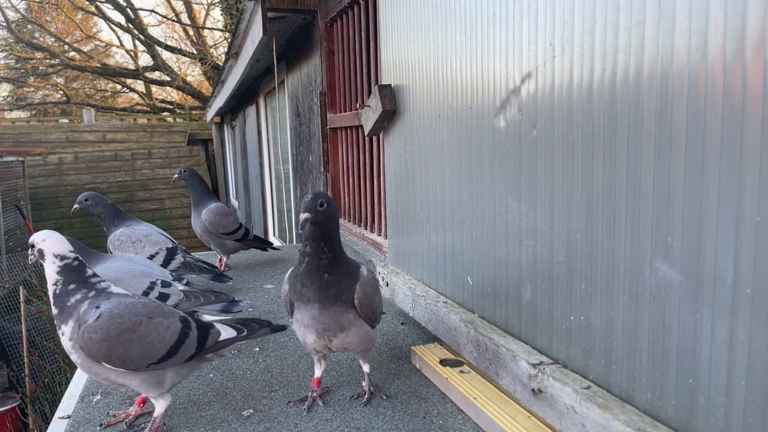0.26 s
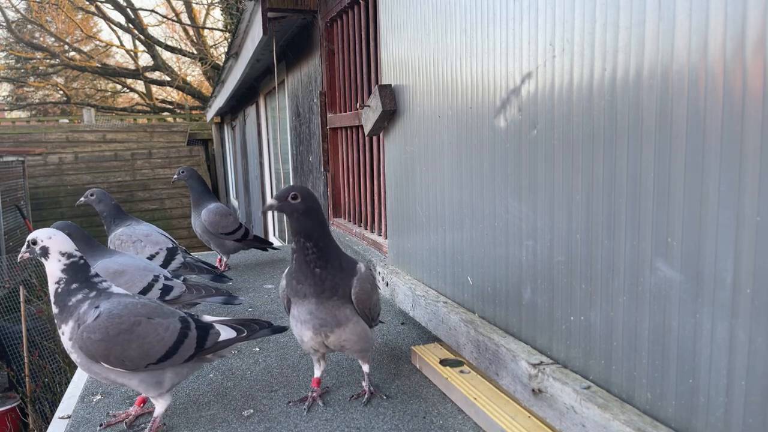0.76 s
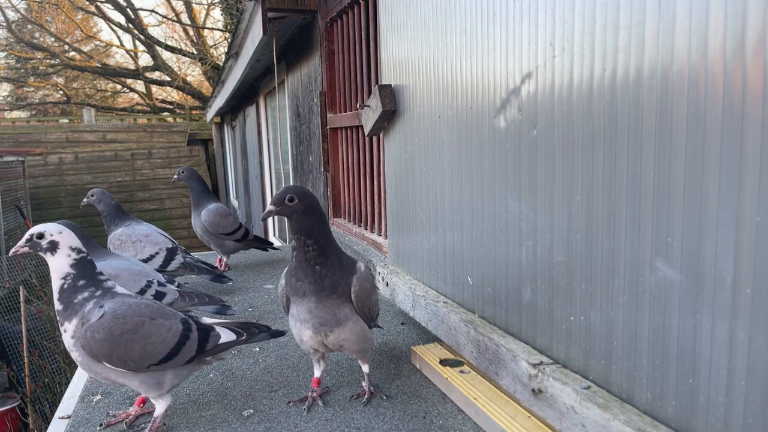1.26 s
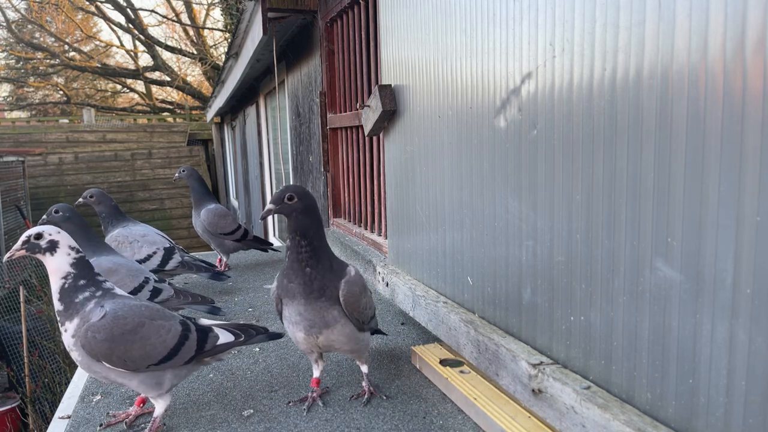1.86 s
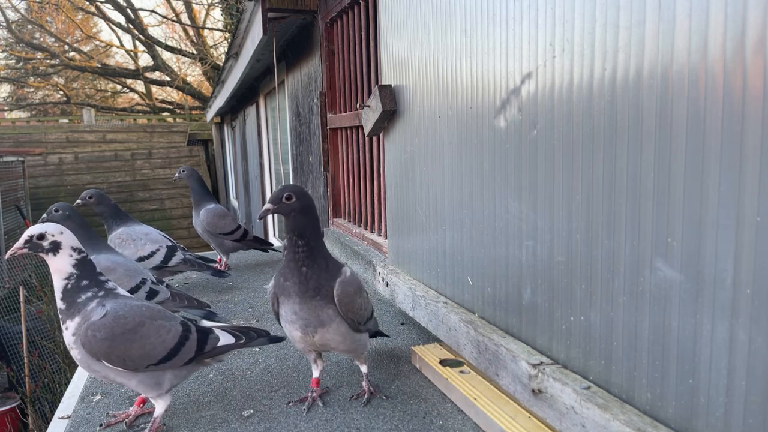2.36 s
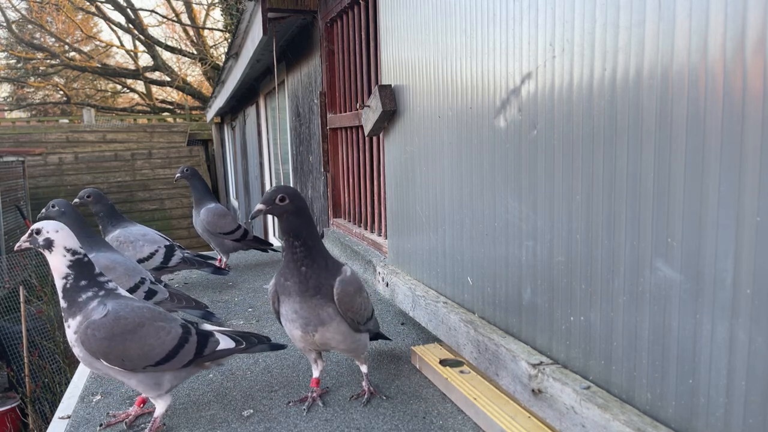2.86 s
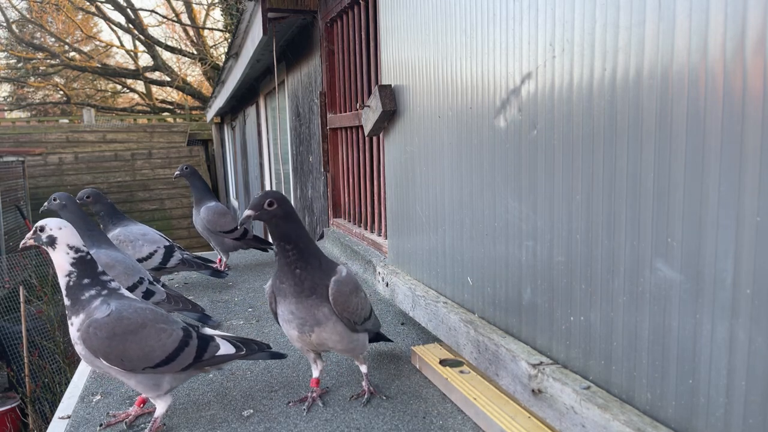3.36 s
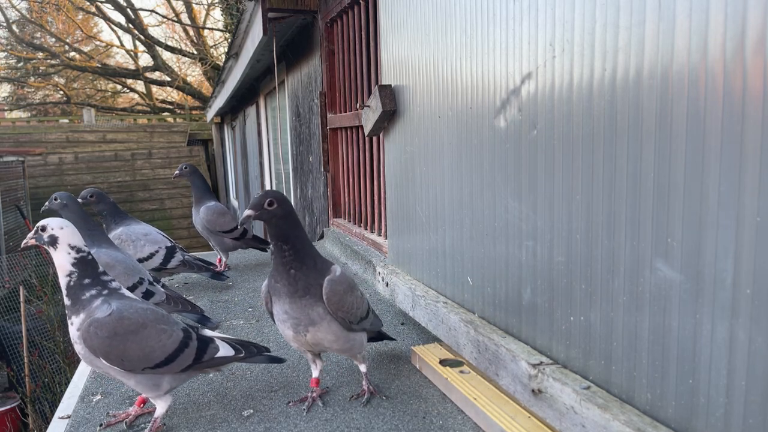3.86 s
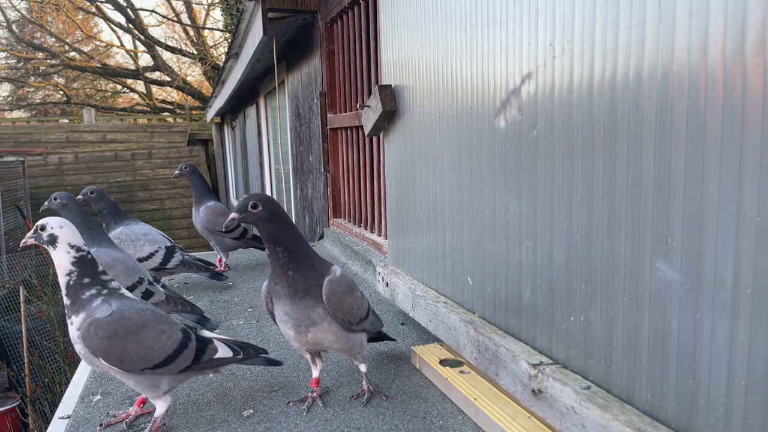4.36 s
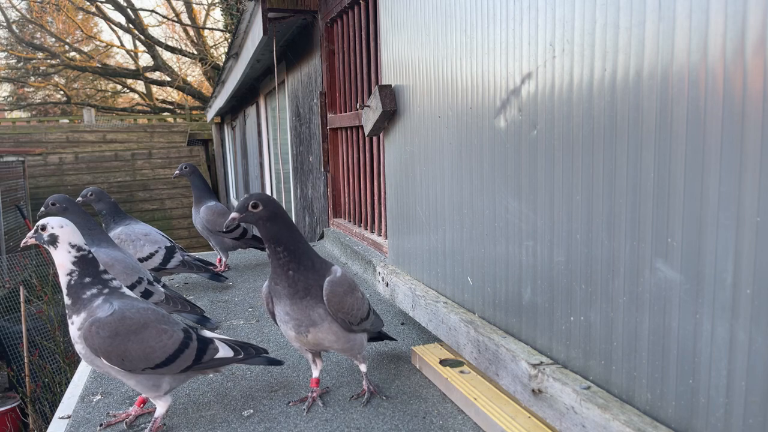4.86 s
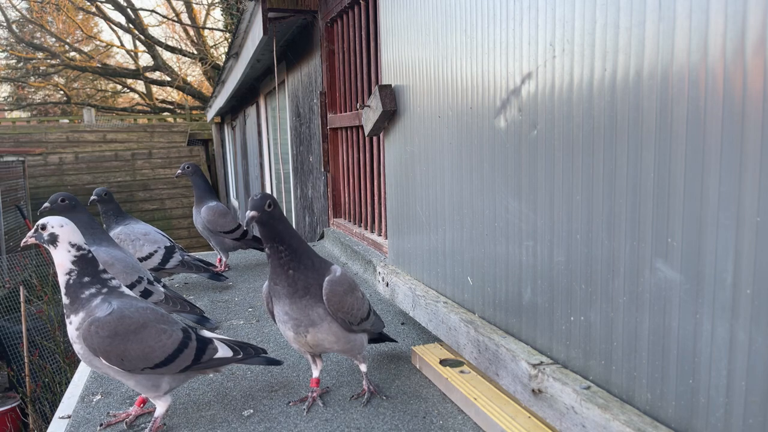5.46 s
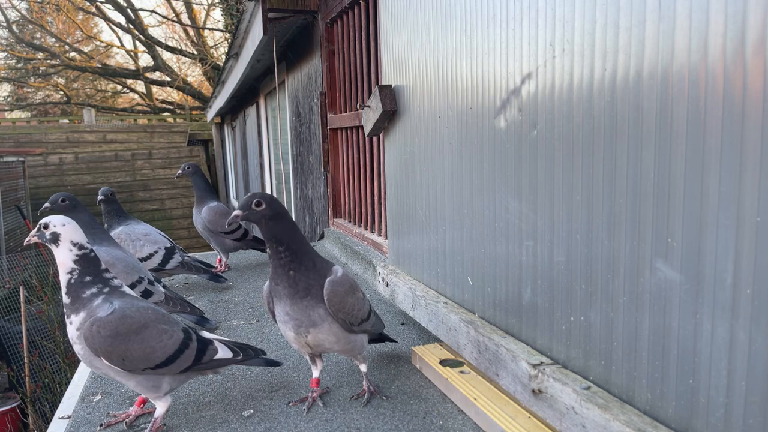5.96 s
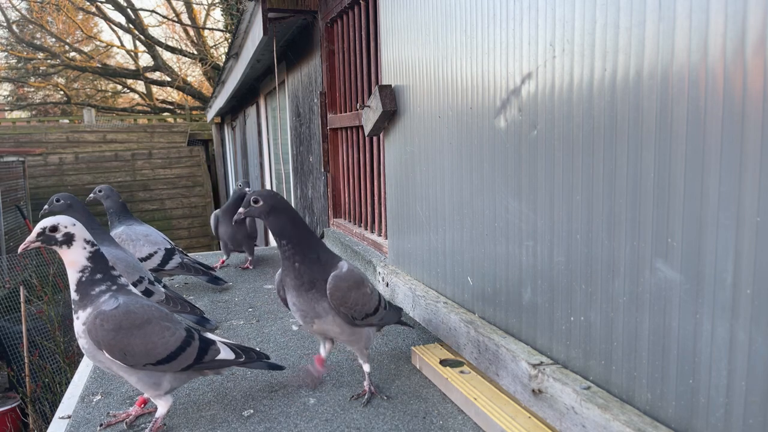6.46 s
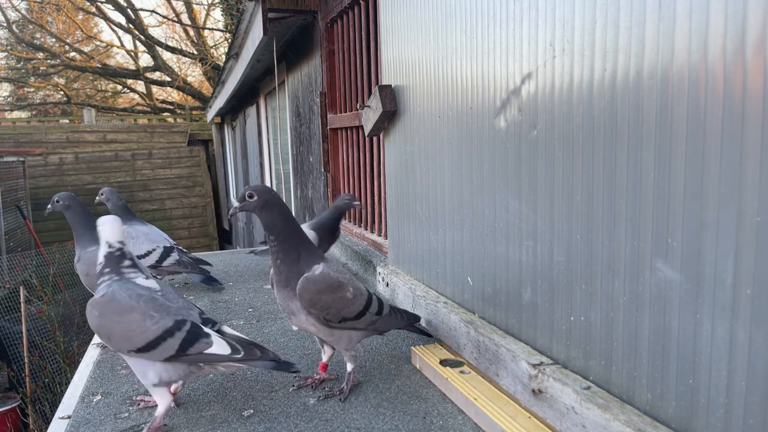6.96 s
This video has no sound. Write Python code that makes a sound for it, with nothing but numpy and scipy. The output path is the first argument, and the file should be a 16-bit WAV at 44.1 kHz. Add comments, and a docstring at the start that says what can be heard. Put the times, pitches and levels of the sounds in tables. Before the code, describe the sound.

Pigeons clap and rustle their wings outdoors in sharp cracks, then after a lull one squeaks breathily close by and claws scrabble on roof boards.

```python
"""Pigeons on a loft roof: sharp wing claps (sprays of tiny snaps plus cupped air) over a rush of feathers (noise).
Later claws scratch and thump the roof boards (snaps into damped resonances), with grainy feather brushes between.
A breathy squeak warbles close by (gliding tone, octave, hiss) and puffs of wind thud on the microphone (low noise).
A songbird whistles far away, over distant traffic (two noise bands) that fades and swells again at the end."""
import sys
import numpy as np
from scipy import signal
from scipy.fft import rfft, irfft, next_fast_len
from scipy.io import wavfile
from scipy.ndimage import uniform_filter1d, map_coordinates

SR = 44100
rng = np.random.default_rng(int(sys.argv[2]) if len(sys.argv) > 2 else 0)


def master(y):
    """Save y as 16-bit WAV."""
    cut = np.clip(np.atleast_2d(y).T, -1, 1)
    pcm = np.round(cut * 32767)  # scale
    wavfile.write(sys.argv[1], SR, pcm.astype(np.int16))


N = 317961  # samples in the scene


def amp(db):
    """Decibels to linear gain."""
    return 10 ** (np.asarray(db) / 20)


def unit(x):
    """Scales x to an rms of 1."""
    return x / np.sqrt(np.mean(x ** 2) + 1e-20)


def along(points, hz):
    """Reads (frequency, value) points on a log frequency axis."""
    f, v = np.transpose(points)
    return np.interp(np.log(hz + 1), np.log(f + 1), v)


def curves(rows):
    """One value per sample for each column after the time."""
    s, *cols = np.transpose(rows)
    return [np.interp(np.arange(N) / SR, s, c) for c in cols]


def wobble(rate):
    """A smooth random curve with rate knots a second."""
    knots = rng.standard_normal(int(N * rate / SR) + 4)
    return map_coordinates(knots, [np.arange(N) * rate / SR])


def filtered(x, response):
    """Multiplies the spectrum of x by a complex response of frequency."""
    m = next_fast_len(len(x) + 4096)
    return irfft(rfft(x, m) * response(np.fft.rfftfreq(m, 1 / SR)), m)[:len(x)]


def modes(table):
    """Causal response of damped resonances, summed with alternating sign."""
    def response(f):
        return sum((-1) ** k * amp(db) * 1j * f * width / (centre ** 2 - f ** 2 + 1j * f * width)
                   for k, (centre, width, db) in enumerate(table))
    return response


def causal(spectrum):
    """Minimum-phase impulse response with this spectrum shape, energy 1."""
    gain = amp(along(spectrum, np.fft.rfftfreq(2048, 1 / SR)))
    cep = irfft(np.log(gain + 1e-4))
    cep[1:1024] *= 2  # fold the cepstrum onto positive time
    cep[1025:] = 0
    h = irfft(np.exp(rfft(cep)))[:1024]
    return h / np.linalg.norm(h)


def tilted(x, tilt_db, hz=5000):
    """Raises or lowers the treble above hz."""
    treble = signal.sosfilt(signal.butter(2, hz, "high", fs=SR, output="sos"), x)
    return x + (amp(tilt_db) - 1) * treble


def rush(spectrum, patchy_db):
    """Coloured noise of rms 1 with random gain in patches of time and frequency."""
    z = signal.stft(rng.standard_normal(N), nperseg=512)[2]
    field = uniform_filter1d(rng.standard_normal(z.shape), size=6, axis=0)
    field = uniform_filter1d(field, size=8, axis=1)
    patchy = signal.istft(z * amp(patchy_db * unit(field)), nperseg=512)[1][:N]
    return unit(filtered(patchy, lambda hz: amp(along(spectrum, hz))))


# each contact favours a random band of its own: middle [Hz], log spread, gain [dB], sharpness
RING_HZ, RING_SPREAD, RING_DB, RING_Q = 4500, 0.59, 5, 3.5


def bursts(events, low_db, length, spiky_db, tail_db, tail_t60):
    """Each contact sprays tiny snaps with a rustling tail; returns the spray and a copy to drive a low body."""
    high, low = np.zeros(N + SR), np.zeros(N + SR)
    t = np.arange(SR // 8) / SR
    fall = amp(-60 * (t / length) ** 2) + amp(tail_db - 60 * t / tail_t60)
    shape = fall * (1 - np.exp(-t / 0.00034))
    for s, db, tilt_db in events:
        start = round(s * SR)
        snaps = rng.standard_normal(len(t)) * amp(spiky_db * rng.standard_normal(len(t)))
        # equal energy for every spray, so only the event level sets its strength
        spray = shape * snaps * np.linalg.norm(shape) / np.linalg.norm(shape * snaps)
        ring_hz = np.clip(RING_HZ * np.exp(RING_SPREAD * rng.standard_normal()), 1000, 12000)
        ring = signal.lfilter(*signal.iirpeak(ring_hz, RING_Q, SR), spray)
        high[start:][:len(t)] += tilted(amp(db) * (spray + amp(RING_DB) * ring), tilt_db)
        low[start:][:len(t)] += amp(low_db(s, db, tilt_db)) * spray
    return high[:N], low[:N]


# distant traffic: (time [s], rumble level [dB], tyre roar level [dB])
TRAFFIC_LEVELS = [(0.0, -42.5, -44), (.4, -44, -43), (0.84, -46, -44.5), (1.42, -39.5, -42),
                  (1.7, -45.5, -43.5), (2.25, -41, -41.5), (2.75, -43, -43.5), (3.2, -43.5, -45),
                  (3.88, -49, -47.5), (4.48, -52, -50.5), (5.34, -53, -51.5), (6.1, -51.5, -52),
                  (6.45, -54.5, -53.5), (6.97, -46.5, -51.5), (7.21, -45, -47.5)]
# colour of the engines: (frequency [Hz], relative level [dB])
RUMBLE_COLOUR = [(15, -45), (25, -31.5), (49, 0.5), (162, -3), (295, -10), (339, -24), (399, -15.5),
                 (500, -18), (650, -41.5), (1100, -120)]
# colour of the tyres: (frequency [Hz], relative level [dB])
ROAR_COLOUR = [(180, -41), (300, -10), (486, -11.5), (565, -9.5), (656, -5.5), (1140, -2.5), (2170, -15),
               (3030, -26.5), (5250, -38.5), (10700, -48), (16000, -63.5)]


def traffic():
    """Far engines and tyres: two noise bands with wavering levels, the rumble quicker than the roar."""
    rumble_db, roar_db = curves(TRAFFIC_LEVELS)
    rumble = amp(rumble_db + 1.7 * wobble(13)) * rush(RUMBLE_COLOUR, patchy_db=1.5)
    roar = amp(roar_db + 0.37 * wobble(5)) * rush(ROAR_COLOUR, patchy_db=1.0)
    return rumble + roar


# how long the echo lasts: (frequency [Hz], time to fall 60 dB [s])
YARD_DECAY = [(500, .3), (3000, .2), (7000, 0.071), (12000, 0.16)]


def yard(x):
    """Walls and fence answer with a diffuse tail; each frequency dies at its own speed."""
    hz, t, z = signal.stft(rng.standard_normal(SR // 2), SR, nperseg=256)
    fading = z * amp(-60 * t / along(YARD_DECAY, hz)[:, None])
    tail = signal.istft(fading, SR, nperseg=256)[1]
    return signal.fftconvolve(x, tail / np.linalg.norm(tail))[:N]


# songbird notes: (start [s], length [s], first pitch [Hz], last pitch [Hz], level before fade and flutter [dB])
SONG_NOTES = [(3.13, .07, 7700, 7200, -69), (3.188, .07, 6840, 6650, -66), (3.26, .07, 7550, 7050, -68.5),
              (3.292, .09, 6850, 6650, -65), (3.396, 0.13, 7500, 6800, -67), (3.46, 0.082, 6850, 6400, -67),
              (3.548, .155, 4470, 4480, -55), (3.68, .21, 4470, 4480, -62.5),
              (3.865, 0.13, 4450, 4430, -71)]
# higher notes are less steady: (frequency [Hz], random wander [share of pitch])
NOTE_QUAVER = [(4500, 0.006), (6500, .015)]


def songbird():
    """Thin gliding sine whistles whose pitch quavers and whose level flutters."""
    out = np.zeros(N)
    for s, length, first_hz, last_hz, db in SONG_NOTES:
        n = round(length * SR)
        quaver = 1 + along(NOTE_QUAVER, first_hz) * wobble(198)[:n]
        hz = np.linspace(first_hz, last_hz, n) * quaver
        level = amp(db - np.linspace(0, 3.5, n)) * np.hanning(n) ** 0.42
        out[round(s * SR):][:n] += level * np.sin(2 * np.pi * np.cumsum(hz) / SR)
    return out * amp(2.6 * wobble(90))


# wind puffs: (time of the middle [s], level at the middle [dB], half-span [s])
WIND_PUFFS = [(1.063, -37, .06), (2.173, -33, .1), (4.133, -36, .04), (4.183, -33, 0.056),
              (5.026, -33, .05), (5.578, -31, .0068), (5.589, -25, 0.059), (5.697, -35, .07),
              (5.794, -42, .03), (5.879, -40, .03), (6.34, -34, 0.05)]
# reach [Hz] at -35.5 dB, its growth [dB per dB of level], and the cycles per half-span added to it
EDDY_HZ, EDDY_GROWS, EDDY_CYCLES = 85, 1.0, 4.8


def puffs():
    """Low turbulence on the microphone; a stronger or shorter puff reaches higher."""
    out = np.zeros(N + SR)
    for s, db, length in WIND_PUFFS:
        n = round(2 * length * SR)
        reach_hz = EDDY_HZ * amp(EDDY_GROWS * (db + 35.5)) + EDDY_CYCLES / length

        def colour(hz):
            return hz ** 2 / (hz ** 2 + 55 ** 2) / (1 + (hz / reach_hz * 1.91) ** 3.1)
        eddy = unit(filtered(rng.standard_normal(n), colour))
        out[round(s * SR) - n // 2:][:n] += amp(db) * eddy * np.hanning(n) ** 2
    return out[:N]


# the squeak, two arches that wobble at the top: (time [s], pitch [Hz], effort [dB])
SQUEAK_PATH = [(5.918, 1545, -53), (5.931, 1592, -25.5), (5.944, 2150, -31), (5.957, 2476, -20.5),
               (5.98, 2546, -17.5), (5.988, 2387, -29), (5.998, 2446, -17), (6.012, 2420, -30.5),
               (6.026, 2005, -30), (6.038, 1786, -31), (6.049, 1720, -45), (6.068, 2497, -17),
               (6.082, 2580, -24.5), (6.098, 2516, -15.5), (6.11, 2328, -22), (6.121, 2558, -17.5),
               (6.137, 2576, -22.5), (6.151, 2520, -17), (6.158, 2370, -31), (6.168, 2550, -23.5),
               (6.185, 2460, -18), (6.197, 2370, -33), (6.205, 2310, -29), (6.228, 2100, -30),
               (6.243, 1900, -53), (6.258, 1820, -29), (6.278, 1584, -31), (6.296, 1404, -35.5),
               (6.325, 1336, -60)]
# gain of the tone and its octave: (frequency [Hz], gain [dB])
THROAT_GAIN = [(1380, -31), (1570, -36), (1790, -5.5), (2150, 0.8), (2600, 0.4), (3000, 3), (3600, -0.2),
               (4300, -9.5), (5100, -16)]
# upper partials show only near the top resonances: (frequency [Hz], level [dB])
OVERTONE_LEVELS = [(9200, -30), (10350, -5), (11100, -18), (11900, -1), (12800, -26.5)]
# resonances of the bright jet hiss: (centre [Hz], width [Hz], gain [dB])
BREATH_MODES = [(4740, 980, -3.5), (7400, 2000, -5.5), (10430, 500, 0.5), (11600, 1500, -8.5),
                (14500, 2500, -12.5)]
# resonances of the lower hiss: (centre [Hz], width [Hz], gain [dB])
CAVITY_MODES = [(2190, 190, 4.5), (3530, 660, 1)]
OCTAVE_GROWS = 1.44  # the octave swings wider than the tone [dB per dB of effort]
# hiss held between two times [s], rise over 30 dB [s], jet release [dB per s]
BREATH_S, ATTACK_S, RELEASE_DB_PER_S = (5.94, 6.265), 0.014, 702
# base hiss levels [dB]; at low pitch the cavity gains and the jet loses [dB]; the cavity's slow decay [s per 60 dB]
CAVITY_DB, JET_DB, EDGE_DB, JET_SAG_DB, CAVITY_T60 = -42, -41.5, 7, 3.5, 0.47


def squeak():
    """An unsteady air jet: a tone with octave and faint rough overtones, plus hiss in fixed resonances."""
    hz, effort_db = uniform_filter1d(curves(SQUEAK_PATH), size=80, axis=1)
    t = np.arange(N) / SR
    opens, closes = BREATH_S
    onset_db = 30 * np.minimum(t - opens, 0) / ATTACK_S
    after = np.maximum(t - closes, 0)
    sunk = np.clip((2300 - hz) / 600, 0, 1)  # 1 where the pitch is low

    tone_db = effort_db + along(THROAT_GAIN, hz)
    octave_db = OCTAVE_GROWS * (effort_db + 25.5) - 23 + along(THROAT_GAIN, 2 * hz) + 1.5 * wobble(70)
    phase = 2 * np.pi * np.cumsum(hz * (1 + 0.007 * wobble(330))) / SR
    tone = amp(tone_db + 1.1 * wobble(320)) * np.sin(phase)
    tone += amp(octave_db + 3.1 * wobble(220)) * np.sin(2 * phase)
    sounding = (t > SQUEAK_PATH[0][0]) * (t < SQUEAK_PATH[-1][0])

    # the cavity drops 12 dB quickly at the close, on top of its slow decay
    closing_db = -60 * after / CAVITY_T60 - 12 * np.minimum(after / .05, 1)
    cavity_db = CAVITY_DB + EDGE_DB * sunk + onset_db * .6 + closing_db
    cavity_hiss = unit(filtered(rng.standard_normal(N), modes(CAVITY_MODES)))
    cavity = amp(cavity_db + 2.9 * wobble(150)) * cavity_hiss

    upper = sum(amp(along(OVERTONE_LEVELS, k * hz) + 3.1 * wobble(150)) * np.sin(k * phase)
                for k in range(4, 8))
    edge_hz = 6900 + 1.95 * hz  # a narrow band of hiss that rises and falls with the tone
    edge = unit(wobble(600) * np.sin(2 * np.pi * np.cumsum(edge_hz) / SR))
    breath = unit(filtered(rng.standard_normal(N), modes(BREATH_MODES)))
    jet_db = JET_DB - JET_SAG_DB * sunk + 2.9 * wobble(60) + onset_db - RELEASE_DB_PER_S * after
    jet = amp(jet_db) * (amp(-1.5) * breath + amp(-2.5) * upper + amp(-6.0) * edge)
    return np.sqrt(2) * tone * sounding + cavity + jet


# claws and feet on the boards: (time [s], strength [dB], treble tilt [dB])
FOOTFALLS = [(6.3125, -30, 6.5), (6.5109, -19.5, 3), (6.6255, -22.5, -5), (6.7082, -24, -21),
             (6.764, -25.5, 1), (6.815, -16.5, 3), (6.8274, -42, 6.5), (6.8655, -14.5, 2), (6.9009, -37, 9),
             (6.9624, -32, -9), (6.9712, -13.5, -1), (7.006, -34, 14), (7.0244, -39, 4.5),
             (7.0408, -35.5, 5), (7.0767, -24.5, -12), (7.088, -26, -0.6), (7.0976, -41, 11),
             (7.1062, -20, 3), (7.1584, -41, 5), (7.1767, -40, -2.5), (7.1947, -36, -8)]
# colour of the claw scratch: (frequency [Hz], relative level [dB])
CLAW_COLOUR = [(410, -26), (700, -3.5), (2220, 0), (4430, -9), (4920, -11.5), (5540, -15), (10900, -17),
               (15000, -27), (16000, -31.5)]
# resonances of the roof board, lowest first: (centre [Hz], width [Hz], gain [dB])
BOARD_MODES = [(108, 73, 0.5), (170, 29, -4), (276, 190, -2.5), (493, 180, 0.5), (910, 450, -7),
               (1490, 170, -21)]
STEP_S = 0.015  # the spray falls 60 dB in this time, apart from its tail
# tread drive [dB] of a -24.5 dB step from 6.78 s on, its growth [dB per dB], and its rise before 6.78 s
THUMP_DB, THUMP_GROWS, HEAVIER_DB_PER_S = -43, 0.59, 23


def steps():
    """Claws scratch, and the board thumps just after, then springs back with its lowest modes."""
    def thump_db(s, db, tilt_db):
        return THUMP_DB + HEAVIER_DB_PER_S * min(s - 6.78, 0) + THUMP_GROWS * (db + 24.5)
    scratch, tread = bursts(FOOTFALLS, thump_db, STEP_S, spiky_db=7.0, tail_db=-12.5, tail_t60=0.037)
    claws = amp(-10.5) * signal.fftconvolve(scratch, causal(CLAW_COLOUR))[:N]
    thump = amp(24.5) * filtered(np.roll(tread, round(.005 * SR)), modes(BOARD_MODES))
    spring_back = amp(22) * filtered(np.roll(tread, round(.017 * SR)), modes(BOARD_MODES[:3]))
    return claws + thump + spring_back


# feathers brushing past each other or the boards: (start [s], length [s], starting level [dB], treble tilt [dB])
FEATHER_BRUSHES = [(0.033, 0.022, -50, 7.5), (0.079, .085, -42.5, 6), (0.218, 0.034, -49, -11),
                   (.31, 0.038, -49, -4), (0.376, 0.075, -46.5, 2), (0.595, 0.038, -54, -14),
                   (.635, .02, -54, -5), (0.694, 0.088, -49, -17), (0.878, 0.044, -48, -2),
                   (1.697, .03, -51, 8), (1.758, 0.019, -40, 2), (2.12, 0.033, -51, -6),
                   (2.26, .045, -50, 11), (2.355, 0.039, -40.5, 3.5), (2.433, 0.033, -53, 12),
                   (2.469, 0.037, -44.5, 6), (2.584, 0.035, -44.5, 3), (2.686, .035, -45.5, -4),
                   (2.773, 0.066, -47, 10.5), (3.042, 0.06, -49, 5), (3.345, 0.035, -54, 4),
                   (3.39, .02, -57, 2), (4.001, .042, -61, 0.5), (6.437, 0.043, -46.5, 3.5),
                   (6.607, .038, -45, 3), (6.64, 0.055, -56, -1), (6.725, .057, -61, 7),
                   (6.76, 0.022, -44, -9), (6.791, 0.082, -49, 10.5), (6.978, 0.11, -53, 5),
                   (7.075, .038, -50, 0), (7.126, .13, -60, 8)]
# colour of feathers, for the brushes and the wing rush: (frequency [Hz], relative level [dB])
FEATHER_COLOUR = [(880, -34), (1500, -6.5), (2000, -2.5), (3030, -10), (3690, -11), (9470, -26),
                  (10700, -23), (12200, -35.5), (16000, -34.5)]


def brushes():
    """Feather contact as short swishes of grainy noise that start abruptly."""
    envelope, bright = np.zeros(N + SR), np.zeros(N + SR)
    for s, length, db, tilt_db in FEATHER_BRUSHES:
        start = round(s * SR)
        u = np.linspace(0, 1, round(length * SR))
        fades = np.minimum(1, np.minimum(12 * u, 4 * (1 - u)))
        envelope[start:][:len(u)] += amp(db - 8.0 * u) * fades
        bright[start:][:len(u)] = tilt_db
    grains = unit(rng.standard_normal(N) * amp(4.0 * wobble(600) + 0.65 * wobble(120)))
    swishes = signal.fftconvolve(envelope[:N] * grains, causal(FEATHER_COLOUR))[:N]
    return tilted(swishes, bright[:N])


# air through feathers, in flight and later as the birds shuffle: (time [s], level before the tilt [dB])
FLIGHT_LEVELS = [(0.0, -54), (0.61, -65), (0.84, -59), (0.97, -48), (1.37, -45), (1.7, -49.5),
                 (2.04, -50.5), (2.9, -50.5), (3.0, -52), (3.15, -59), (3.6, -69.5), (4.2, -72.5),
                 (4.6, -84.5), (6.4, -85), (6.53, -65), (6.7, -64.5), (6.85, -62), (7.21, -62)]
RUSH_TILT_DB, RUSH_BRIGHTENS = 4.5, .6  # treble tilt [dB] at -51.5 dB, and its rise [dB per dB of level]


def wing_rush():
    """Air through the feathers of several birds: fluttering, crackling noise, brighter when louder."""
    level_db, = curves(FLIGHT_LEVELS)
    tilt_db = RUSH_TILT_DB + RUSH_BRIGHTENS * np.maximum(level_db + 51.5, -26)
    crackle = amp(1.2 * wobble(22.13) + 2.5 * wobble(90) + 1.3 * wobble(900))
    feathers = unit(crackle * rush(FEATHER_COLOUR, patchy_db=2.0))
    return amp(level_db) * tilted(feathers, tilt_db)


# wing claps: (time [s], strength [dB], treble tilt [dB])
WING_CLAPS = [(0.0851, -36, -11), (0.1445, -27, -10), (0.313, -43, -6), (0.3247, -40, -8),
              (0.3693, -32.5, -2), (0.4957, -50, -19), (0.7017, -42.5, -12), (0.8749, -34.5, 3),
              (0.8918, -38, -1), (0.9641, -16.5, 3.5), (1.0344, -29.5, 2), (1.0848, -27, 9.5),
              (1.155, -27, 7.5), (1.199, -16.5, 9), (1.2275, -29, -10), (1.265, -23.5, 3),
              (1.3088, -4, 3.5), (1.4186, -9, 1), (1.484, -24.5, -3), (1.511, -30, -1), (1.5323, -9, 5.5),
              (1.6496, -25.5, 6), (1.79, -31.5, -17), (1.8067, -18, -2), (1.886, -26.5, -4),
              (1.9898, -35, 3), (2.0082, -34.5, 3), (2.0285, -39.5, -20), (2.0721, -38, -11),
              (2.2859, -22.5, 6), (2.4188, -29, -1), (2.4245, -38, -20.5), (2.6533, -38, -1.5),
              (2.7673, -17.5, 4), (2.885, -4.5, 1), (2.9158, -25, -6), (2.9694, -36, -10)]
# colour of the crack: (frequency [Hz], relative level [dB])
CLAP_COLOUR = [(180, -42), (300, -9), (1400, 1.5), (1720, -5), (2320, 0.5), (3590, -8.5), (5100, -4),
               (8160, -4), (14900, -11.5), (16500, -32.5)]
CLAP_S = 0.0097  # the spray falls 60 dB in this time, apart from its tail
# cupped-air drive [dB] of an untilted -27 dB clap, growth [dB per dB], and gain in duller claps [dB per dB of tilt]
CUP_DB, CUP_GROWS, CUP_DULL = -38, .4, 1.28


def wing_claps():
    """Wing tips meet in a crack of tiny snaps and squeeze air from between the wings."""
    def cup_db(s, db, tilt_db):
        return CUP_DB + CUP_GROWS * (db + 27) - CUP_DULL * tilt_db
    crack, body = bursts(WING_CLAPS, cup_db, CLAP_S, spiky_db=12.0, tail_db=-19, tail_t60=0.035)
    cupped = filtered(body, modes([(1300, 1200, -6.5)]))  # one broad, low resonance
    return amp(-12.0) * signal.fftconvolve(crack, causal(CLAP_COLOUR))[:N] + cupped


def scene():
    """Sums every layer and the yard's echoes of claps, feet, squeak and songbird."""
    bird, call, feet, claps = songbird(), squeak(), steps(), wing_claps()
    echoes = amp(-4.5) * yard(bird) + amp(-10.5) * yard(call)
    echoes += amp(-19.5) * yard(feet) + amp(-8.5) * yard(claps)
    background = traffic() + bird + puffs() + echoes
    birds = call + feet + brushes() + wing_rush() + claps
    return (background + birds)[None]


# tone balance of the whole mix: (frequency [Hz], gain [dB])
TONE_BALANCE = [(20, -35.5), (45, -6), (60, 0), (15700, -1), (15900, -22)]
TOP_HZ = 16800  # band limit


def record(dry):
    """Tone balance of the whole: little deep bass, hardly anything above 15.8 kHz, nothing from TOP_HZ up."""
    return filtered(dry[0], lambda hz: amp(along(TONE_BALANCE, hz)) * (hz < TOP_HZ))[None]


dry = scene()
out = record(dry)
master(out)
```